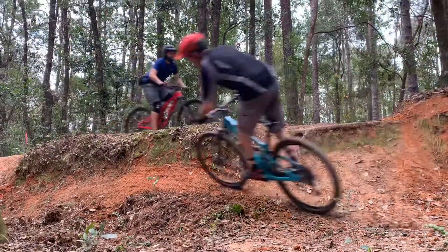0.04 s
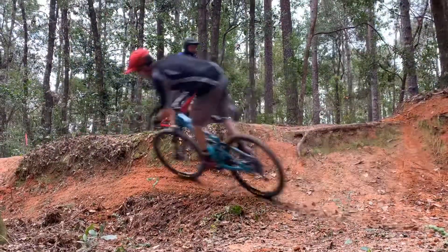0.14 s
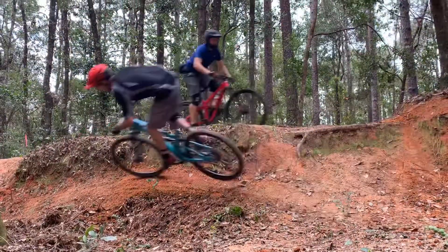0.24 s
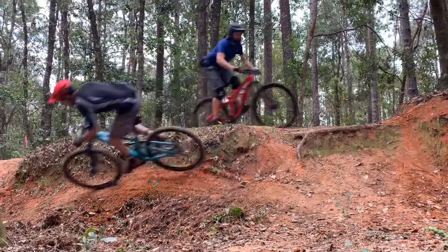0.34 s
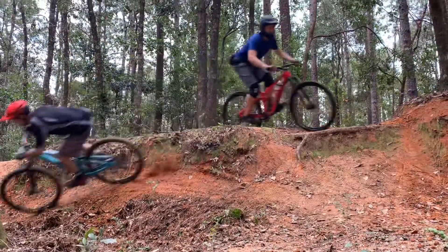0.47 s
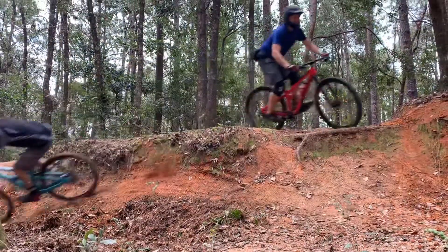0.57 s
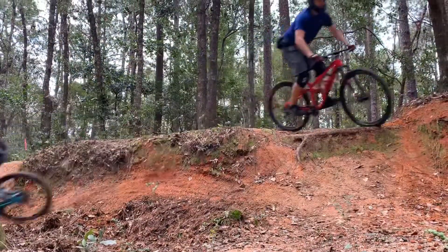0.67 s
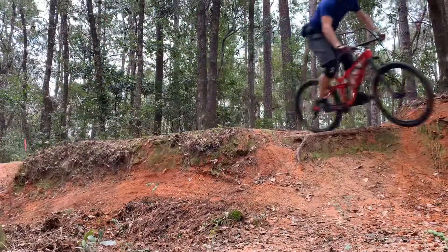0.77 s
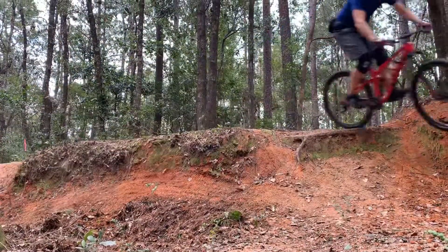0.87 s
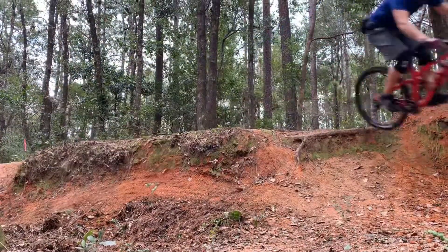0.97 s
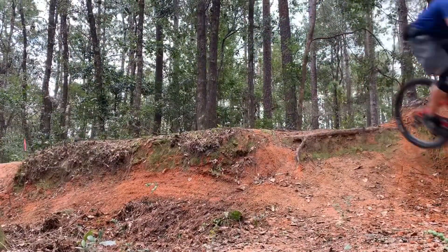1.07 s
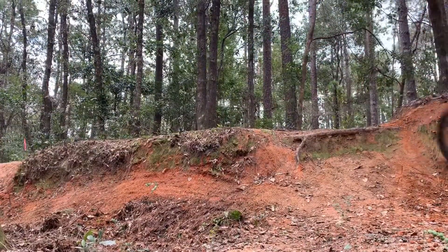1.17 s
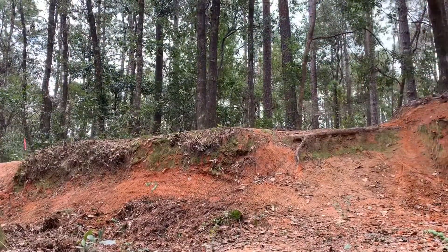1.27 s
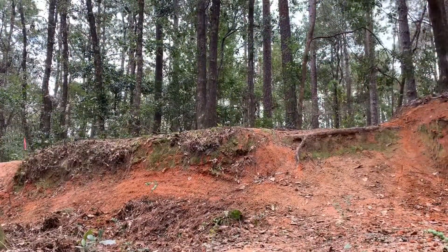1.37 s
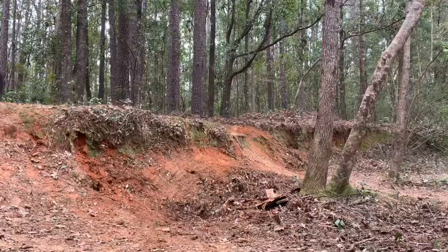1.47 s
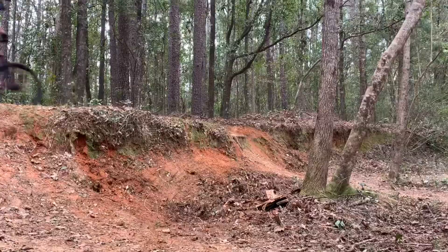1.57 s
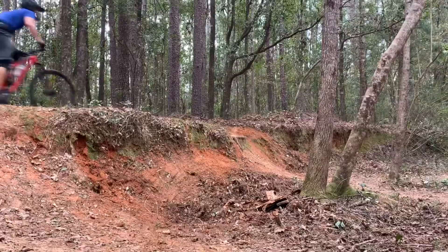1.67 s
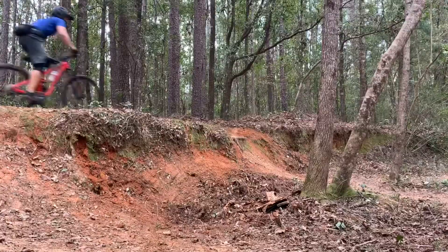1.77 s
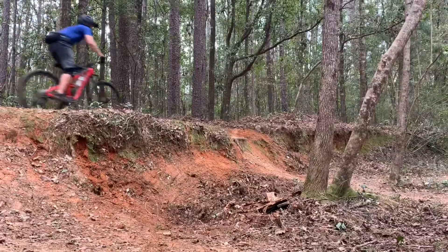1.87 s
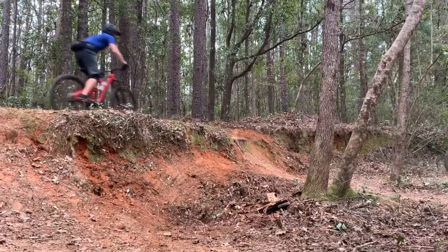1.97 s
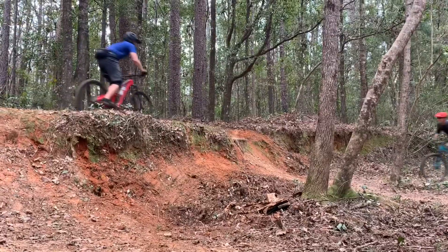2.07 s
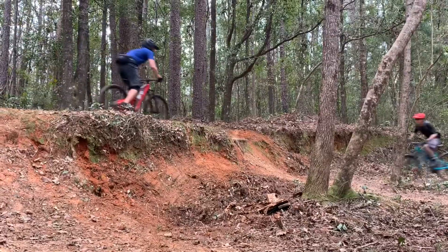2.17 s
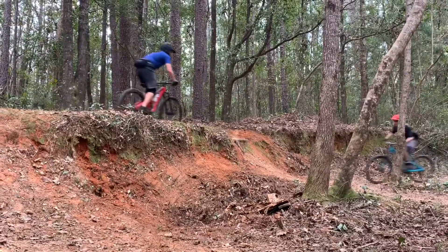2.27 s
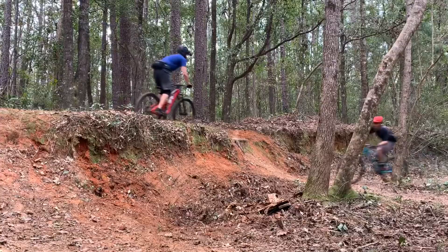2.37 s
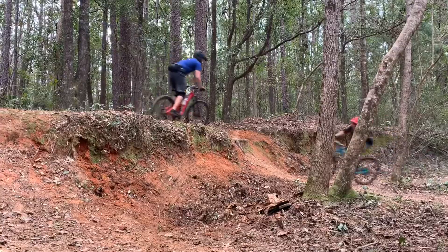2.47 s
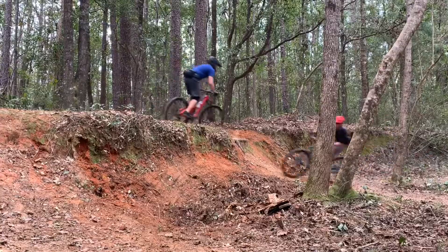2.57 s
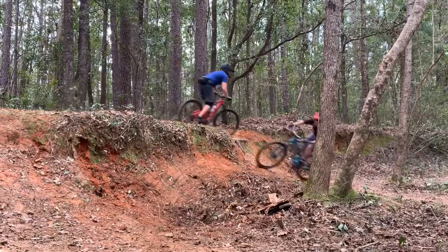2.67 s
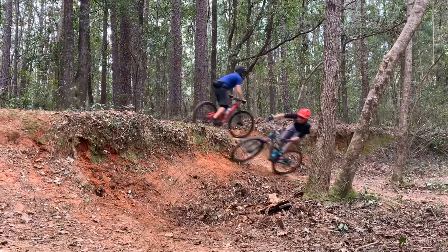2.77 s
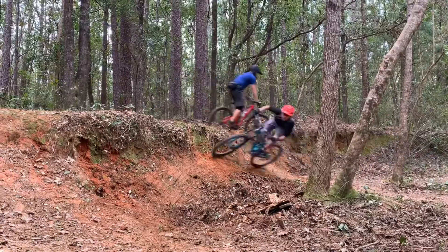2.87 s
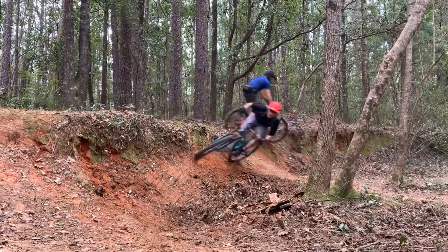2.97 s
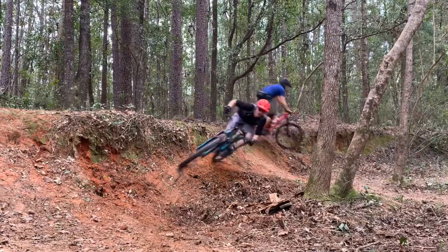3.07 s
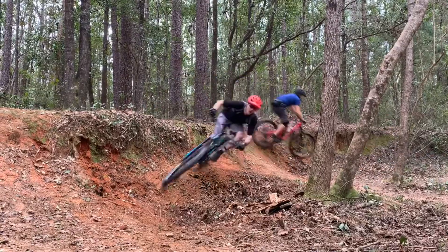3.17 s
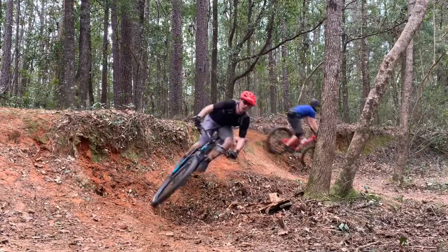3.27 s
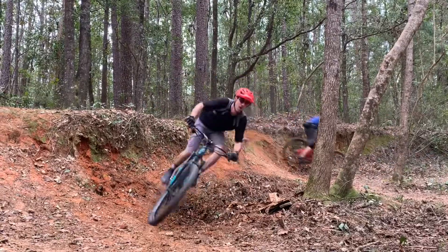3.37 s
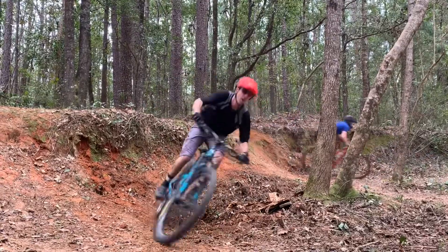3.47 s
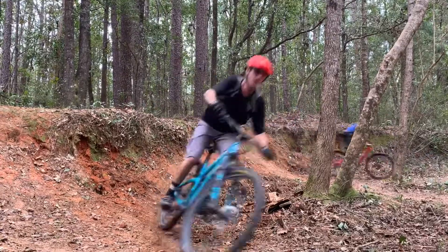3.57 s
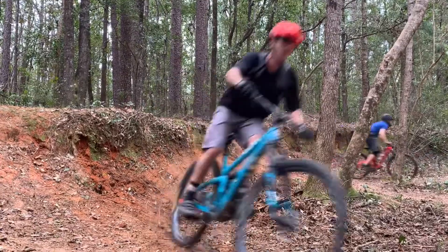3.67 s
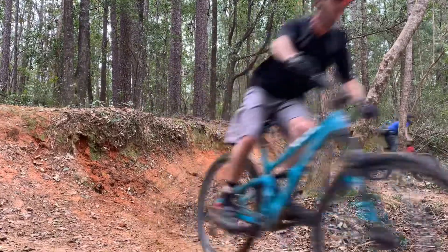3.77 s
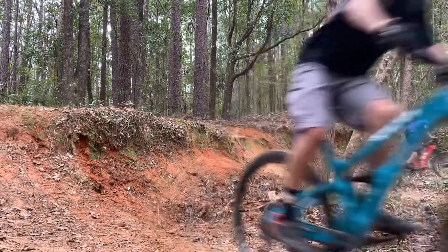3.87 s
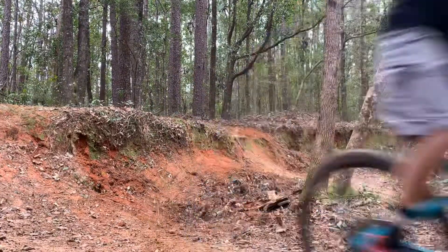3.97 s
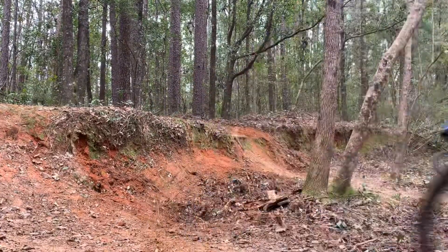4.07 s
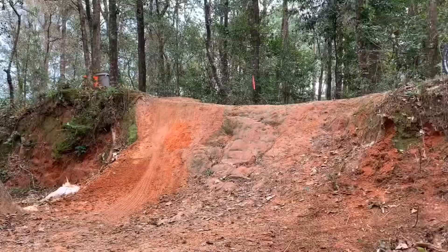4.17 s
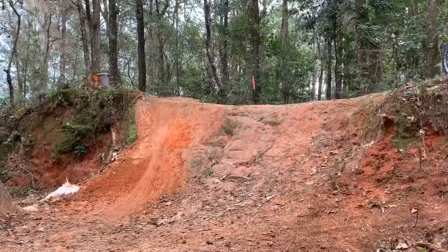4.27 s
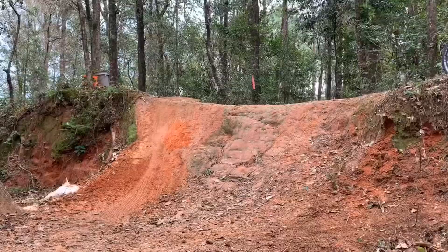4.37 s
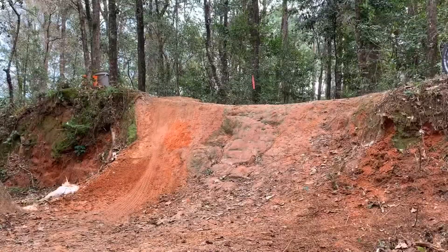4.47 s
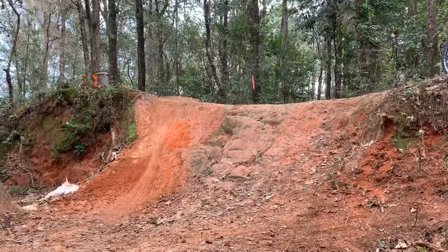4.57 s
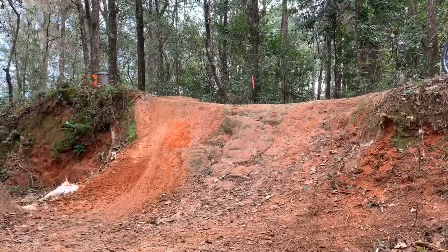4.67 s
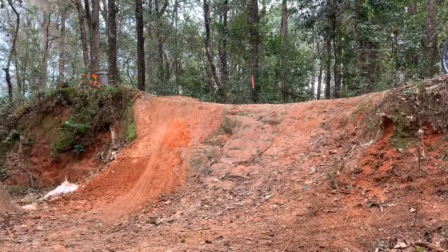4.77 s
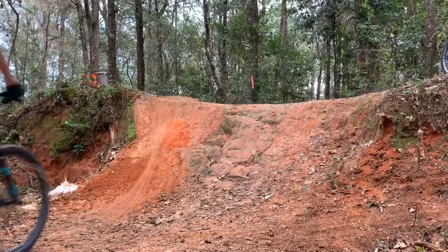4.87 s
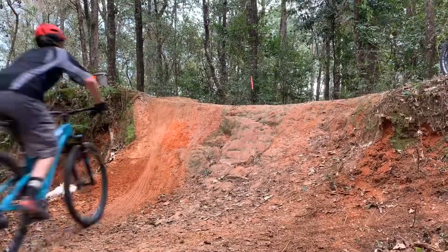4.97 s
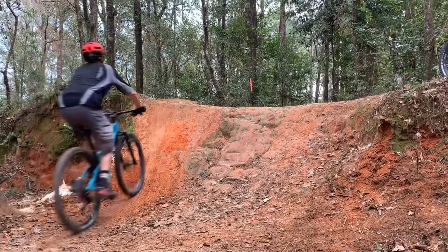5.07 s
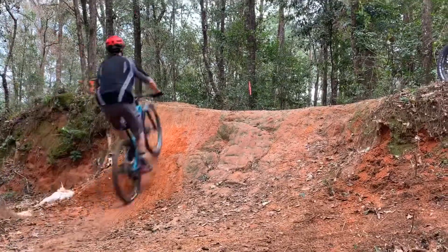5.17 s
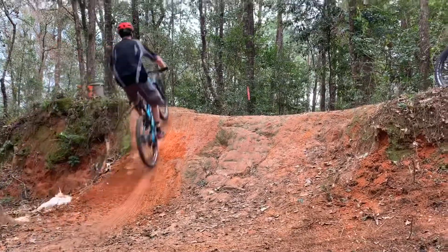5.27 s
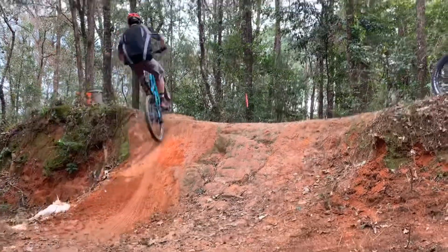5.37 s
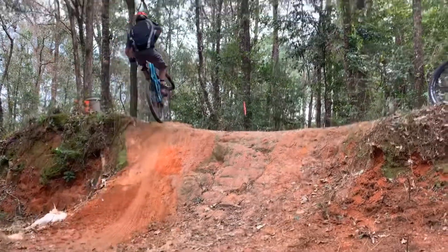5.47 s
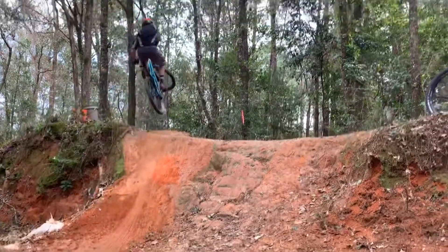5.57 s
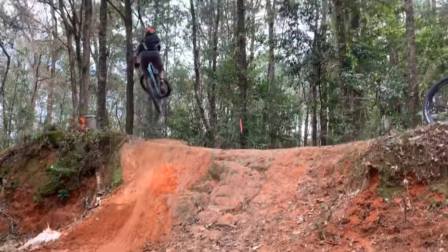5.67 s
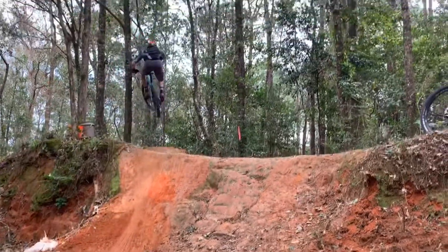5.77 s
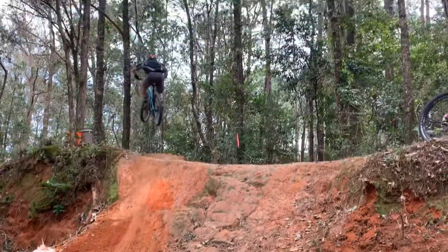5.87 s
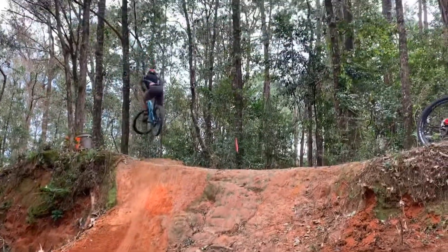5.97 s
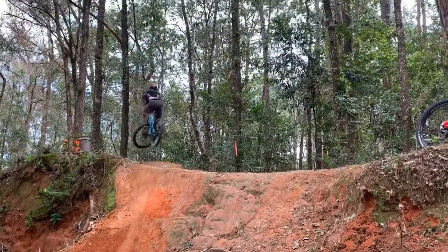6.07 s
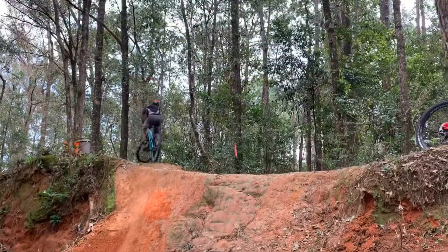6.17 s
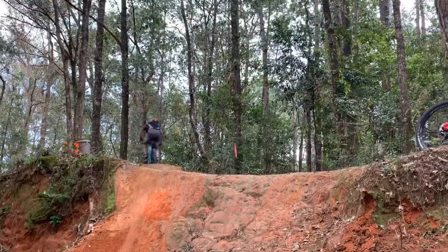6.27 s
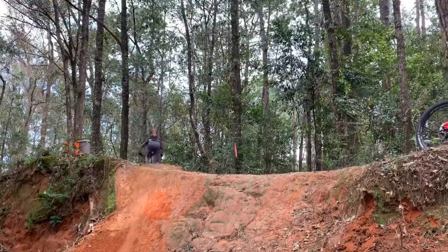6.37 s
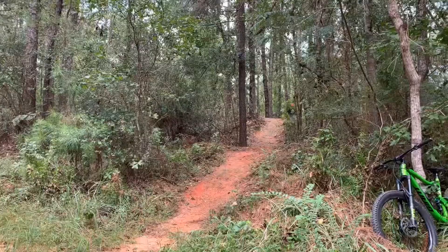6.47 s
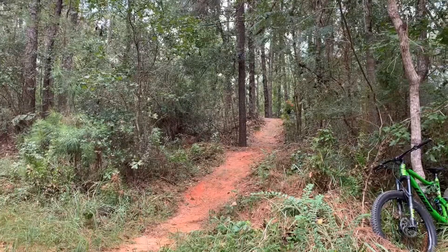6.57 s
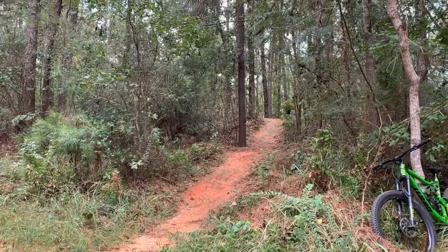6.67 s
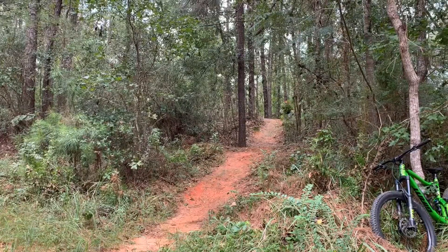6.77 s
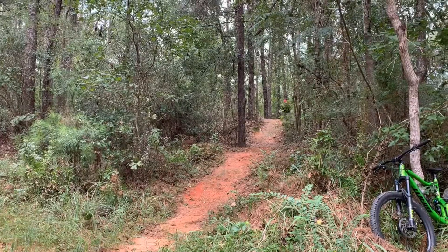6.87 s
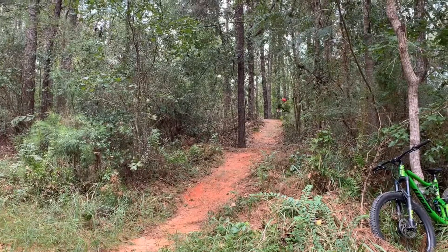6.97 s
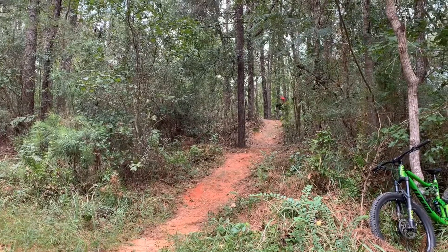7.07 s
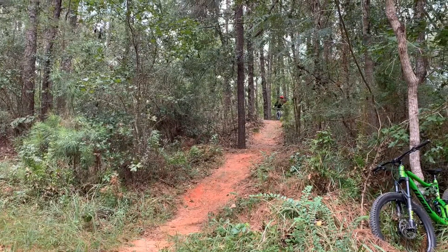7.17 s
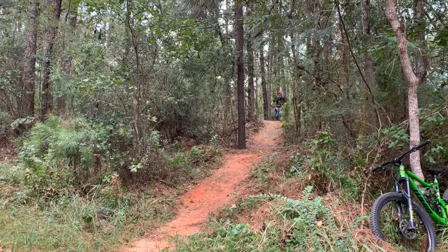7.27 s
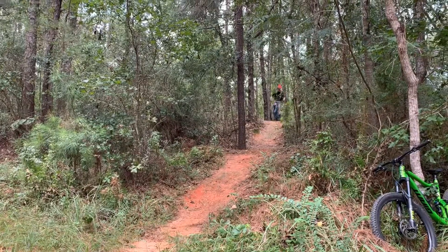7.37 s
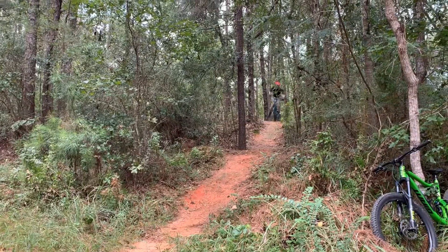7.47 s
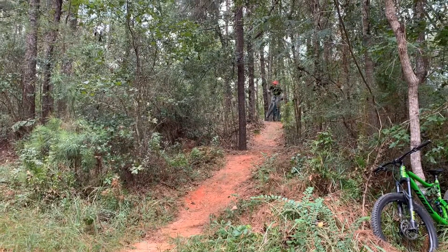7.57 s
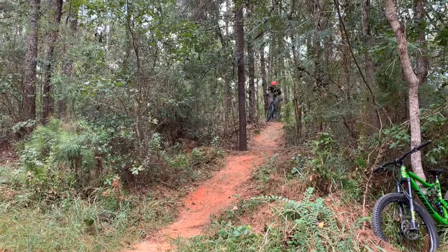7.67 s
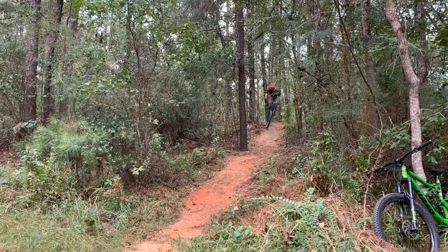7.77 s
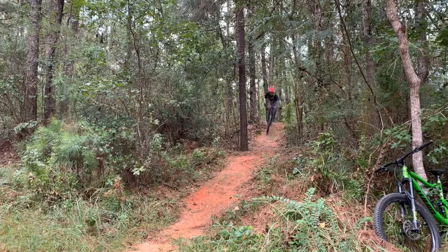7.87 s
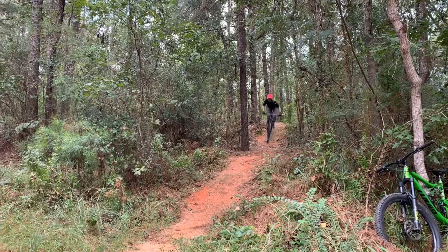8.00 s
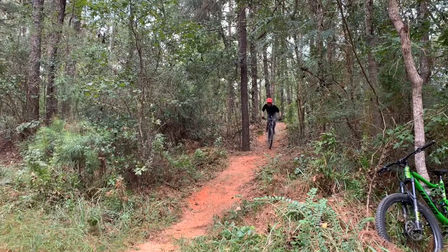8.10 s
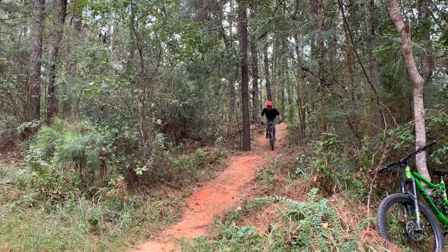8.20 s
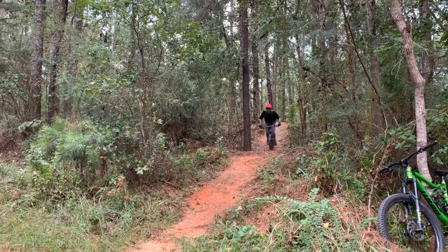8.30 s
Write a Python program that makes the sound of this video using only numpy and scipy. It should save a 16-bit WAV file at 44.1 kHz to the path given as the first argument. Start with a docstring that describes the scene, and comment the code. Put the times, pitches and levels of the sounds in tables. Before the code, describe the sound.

Four outdoor scenes joined by hard cuts, heard from beside a dirt trail. Freehubs tick rapidly over gritty tyre rumble; a heavy slam and metallic clatter end the first pass. A softer approach grows into a close crunching pass-by. Next, tyres hum and buzz quickly up hard clay, then quieten with deep rumbling thuds. Finally still forest air, two short echoing bird calls, and a far bike returning faintly.

```python
"""A pine wood with dirt jumps, where mountain bikes ride past in four short scenes joined by cuts.
Freehubs tick as noise bursts that ring the hub; tyres rumble, crunch and roar as grainy filtered noise.
One bike lands hard close by and its chain slaps the frame: low sine thuds and short ringing bursts.
In the last scene a far bird, made of gliding sines with an echo, calls twice over the quiet air."""
import sys
import numpy as np
from scipy import signal
from scipy.fft import rfft, irfft, next_fast_len
from scipy.io import wavfile
from scipy.ndimage import uniform_filter1d

SR = 44100
rng = np.random.default_rng(int(sys.argv[2]) if len(sys.argv) > 2 else 0)


def dump_mix(stems):
    """Bounce the given channels to the path in sys.argv[1] as a 16-bit WAV at rate SR."""
    frames = np.atleast_2d(stems).T  # one column per channel
    limited = np.clip(frames, -1, 1)  # hard clip at full scale
    pcm = np.round(limited * 32767).astype(np.int16)
    wavfile.write(sys.argv[1], SR, pcm)


N = 367675
TIME = np.arange(N) / SR


def undb(db):
    """Turn decibels into gain."""
    return 10 ** (np.asarray(db) / 20)


def unit(x):
    """Scale to an rms (average strength) of 1."""
    return x / np.sqrt(np.mean(x ** 2))


def curves(rows):
    """Draw each column of a table as a line through time."""
    s, *columns = np.transpose(rows)
    return [np.interp(TIME, s, column) for column in columns]


def colour(x, points, size=2048):
    """Filter with the given (f/Hz, level/dB) outline, never sounding ahead of its input."""
    hz, db = np.transpose(points)
    grid = np.maximum(np.arange(size // 2 + 1) * SR / size, 1)
    outline_db = np.interp(np.log(grid), np.log(hz), db)
    # folding the cepstrum forward gives the filter with the least delay
    cepstrum = irfft(np.log(undb(outline_db)))
    cepstrum[1:size // 2] *= 2
    cepstrum[size // 2 + 1:] = 0
    response = irfft(np.exp(rfft(cepstrum)))
    return signal.oaconvolve(np.atleast_2d(x), response[None], axes=1)[:, :x.shape[-1]]


def ring(x, hz, width_hz):
    """One resonance, with gain 1 at its centre."""
    hz = min(hz, .45 * SR)
    return signal.lfilter(*signal.iirpeak(hz, hz / min(width_hz, SR / 4), fs=SR), x)


def rings(x, rows):
    """Several (f/Hz, width/Hz, level/dB) resonances sounding together."""
    return sum(undb(db) * ring(x, hz, width) for hz, width, db in rows)


def fade(x, decay_s):
    """Give every impulse an exponential tail."""
    return signal.lfilter([1], [1, -np.exp(-1 / (decay_s * SR))], x)


def walk(rate):
    """A random wander in straight lines, with `rate` new targets per second."""
    knots = rng.standard_normal(4096)
    return np.interp(TIME * rate, np.arange(len(knots)), knots)


def noise():
    """Two unrelated white noises."""
    return rng.standard_normal((2, N))


# how spread out the sound is between the trees: f/Hz, level/dB (side against middle)
STEREO_SPREAD = [(50, -16), (130, -15), (280, -15.5), (550, -7), (1100, -4), (2200, 0), (5500, 0.5),
                 (7500, -30.5), (15000, -26)]


def ears(x):
    """Two unrelated signals become left and right: bass and top nearly alike, the middle diffuse."""
    side = colour(x[1], STEREO_SPREAD)[0]
    return np.array([x[0] + side, x[0] - side])


# the scene jumps to another spot on the trail: t/s
CUTS = [1.398, 4.108, 6.358]


def swell(s, rise_db_per_s, fade_db_per_s):
    """Gain that climbs to 1 at its peak and fades again; cuts bound it, and rate signs do not matter."""
    start, end = np.array([0, *CUTS, N / SR])[np.searchsorted(CUTS, s) + np.arange(2)]
    heard = slice(int(start * SR), int(end * SR))
    age, gain = TIME[heard] - s, np.zeros(N)
    gain[heard] = undb(-np.maximum(-age * abs(rise_db_per_s), age * abs(fade_db_per_s)))
    return gain


def sing(x, rows):
    """Steep resonances, each swelling and fading as a bike goes by."""
    out = 0
    for s, rise, fall, db, hz, width in rows:
        # ringing twice makes the sides of the band steeper
        band = ring(ring(x, hz, abs(width)), hz, abs(width))
        out = out + unit(band) * swell(s, rise, fall) * undb(db)
    return ears(out)


def tone(hz, gain, waver, rough_db, rate):
    """A sine that wavers in pitch and level."""
    on, out = gain > 1e-3, np.zeros(N)
    steps = np.arange(on.sum()) * rate / SR
    bend, flutter = (np.interp(steps, np.arange(1024), knots) for knots in rng.standard_normal((2, 1024)))
    phase = 2 * np.pi * np.cumsum(hz[on] * (1 + waver * bend)) / SR
    out[on] = np.sqrt(2) * np.sin(phase) * gain[on] * undb(rough_db * flutter)
    return out


def grit(rate, spread_db, decay_s, bed):
    """Many small fractures of uneven size, `rate` per second, over a smooth bed of rubbing."""
    sizes = undb(spread_db * np.minimum(rng.exponential(size=N), 4))
    strikes = (rng.random(N) < rate / SR) * sizes ** 2
    power = fade(strikes, decay_s / 2)  # power dies twice as fast as level
    return noise() * np.sqrt(power / power.mean() + bed)


def pebbles(rate, low_hz, high_hz, cycles, spread_db):
    """Clods, stones and twigs snap one by one, each a dying sine at a pitch of its own."""
    out, t = np.zeros((2, N + 1024)), TIME[:1024]
    for when, pitch, size, turn in rng.random((int(rate * N / SR), 4)):
        hz = low_hz * (high_hz / low_hz) ** pitch
        ping = np.sin(2 * np.pi * hz * t) * np.exp(-t * hz / cycles)
        ping *= undb(-spread_db * np.log(max(size, .04)))
        start = int(when * N)
        out[:, start:start + len(t)] += np.outer([1, 0.66 * np.cos(2 * np.pi * turn)], ping)
    no_bass = signal.butter(2, low_hz / 2, "high", fs=SR, output="sos")
    return unit(ears(signal.sosfilt(no_bass, out[:, :N])))


def nearness(gain):
    """How clearly single grains stand out: 1 from -33 dB tyre level up, less as the tyres recede."""
    return np.minimum(gain / undb(-33), 1) ** .35


def via_ground(x, share):
    """A bounce off the dirt, about a millisecond late, shifts the colour as the bike rises and falls."""
    late = TIME - 0.001112 * np.exp(0.237 * walk(2.5))
    return x + share * np.array([np.interp(late, TIME, channel) for channel in x])


def trees(x, t60_s, build_s):
    """Trunks scatter the sound into a thin, even tail that builds up and dies away."""
    t = TIME[:SR]
    tail = rng.standard_normal((2, SR)) * undb(-60 * t / t60_s) * (1 - np.exp(-t / build_s))
    return signal.oaconvolve(np.atleast_2d(x), tail / np.sqrt(np.sum(tail[0] ** 2)), axes=1)[:, :N]


# colour of the still air: f/Hz, level/dB (relative)
AIR_COLOUR = [(60, -7), (130, -9.5), (205, 4), (300, -23), (420, -15.5), (560, -22.5), (900, -20),
              (1400, -33.5), (2000, -57), (3000, -78), (5000, -35), (9000, -38), (15000, -53)]


def air():
    """Still air among the trees: soft noise whose level wanders slowly."""
    return unit(ears(colour(noise(), AIR_COLOUR))) * undb(-49.5 + 2.0 * walk(2.45))


# stretches of tyre noise, and a deep wind-like rumble near 6.2 s, each swelling to a peak and fading:
# peak t/s, swell rate/(dB/s), fade rate/(dB/s),
# then level/dB of deep rumble, casing, soil and leaves, before each layer's trim
ROLLS = [(.04, 3, 98, -31, -30.5, -30, -34), (.2, 5, 27, -35.5, -40.5, -69, -39),
         (0.399, 193, 20, -29, -29.5, -39, -39), (1.137, 893, 35.5, -23, -19.5, -35, -36),
         (1.42, 200, 84.5, -49, -56, -41.5, -38), (1.66, 34, 11, -40, -45.5, -45, -43),
         (2.1, 9, 15, -45, -41, -45.5, -63), (2.8, 46, 50, -34.5, -45, -55, -38.5),
         (2.974, 597, 68, -28, -38, -39.5, -35.5), (3.54, 35.5, 28, -31, -28.5, -29.5, -35),
         (3.92, 79, 86, -33, -28.5, -27, -28.5), (4.1, 105.5, 25, -31.5, -26, -25.5, -26.5),
         (4.38, 71, 26, -58, -52, -44, -42), (4.58, 35, 38, -55, -42, -36, -38),
         (4.73, 116, 46, -52, -33.5, -52, -28.5), (4.98, 33, 63, -35.5, -25.5, -39, -55),
         (5.18, 23, 73, -44, -28.5, -29, -40), (5.28, 200, 122, -41, -28, -33, -43),
         (5.6, 12, 7, -62, -67, -55, -49), (6.2, 51, 111.5, -32, -55.5, -68, -70),
         (6.26, 495, 58, -39.5, -54, -46.5, -45), (6.4, 92.5, 73, -62, -46.5, -48, -58.5),
         (7.22, 16, 34, -44, -46.5, -51, -51.5), (7.925, 700, -1, -44, -46, -47.5, -52.5),
         (8.3, 19, 3, -37.5, -46, -46, -47)]


def rolling():
    """Gains of deep rumble, casing, soil and leaves: overlapping rows add in power."""
    rows = np.array(ROLLS)
    swells = np.array([swell(*row) for row in rows[:, :3]])
    return np.sqrt(undb(rows[:, 3:].T) ** 2 @ swells ** 2)


# colour of the deep rumble: f/Hz, level/dB (relative)
RUMBLE_COLOUR = [(20, -58), (33, -38), (48, -4), (70, 0), (110, -3), (150, -10), (250, -29.5), (600, -57)]


def deep_rumble(gain):
    """Low noise that never quite stops and grows with the given gain."""
    rumble = unit(ears(colour(noise(), RUMBLE_COLOUR, size=8192)))
    return rumble * np.hypot(gain * undb(0.5), undb(-44.0))


# colour of the tyre casing: f/Hz, level/dB (relative)
CASING_COLOUR = [(30, -43), (90, -16.5), (145, -8), (180, -2.5), (225, -2), (272, 1.5), (330, -6),
                 (390, -6), (500, -10), (800, -23), (1600, -50.5)]


def casing(gain):
    """Bumps drum the air-filled casings: coarse grains with a low colour."""
    drumming = grit(rate=220, spread_db=2.5, decay_s=0.0065, bed=0.81)
    return unit(ears(colour(drumming, CASING_COLOUR))) * gain * undb(-1.28)


# colour of crunching soil: f/Hz, level/dB (relative)
SOIL_COLOUR = [(40, -46), (250, -22.5), (450, 3.5), (620, 6.5), (800, -4), (1050, -3), (1250, -8.5),
               (1550, 0), (2100, -10.5), (3500, -19), (8000, -80)]
# hollow notes of tyre and rim under the crunch: f/Hz, width/Hz, level/dB (relative)
WHEEL_RINGS = [(403, 22, -10), (480, 40, 2), (580, 33, -2), (693, 71, -2), (882, 21, -6.5), (1049, 29, 1),
               (1610, 17, -21)]


def soil(gain):
    """Knobs grind the soil, which rings tyre and rim; single clods snap when the tyres are close."""
    grind = grit(rate=400, spread_db=3.6, decay_s=0.008, bed=0.35)
    grind = colour(grind, SOIL_COLOUR) + rings(grind, WHEEL_RINGS)
    clods = pebbles(rate=270, low_hz=450, high_hz=1700, cycles=4.9, spread_db=4.5)
    crunch = unit(ears(via_ground(grind, share=0.63))) + undb(-2.5) * nearness(gain) * clods
    return crunch * gain * undb(-2.5)


# colour of dry leaves: f/Hz, level/dB (relative)
LEAF_COLOUR = [(1000, -32.5), (1900, 0), (2700, 5.5), (3300, 2.5), (3900, 4), (4500, 0.5), (5300, -5),
               (6500, 0), (9000, -22), (15500, -11)]


def leaves(gain):
    """Dry leaves crack in a dense bright rush; single twigs snap when the tyres are close."""
    rush = grit(rate=1000, spread_db=5.3, decay_s=0.007, bed=0.5)
    twigs = pebbles(rate=160, low_hz=1800, high_hz=5000, cycles=8, spread_db=4.5)
    crackle = unit(ears(colour(rush, LEAF_COLOUR))) + undb(-5.5) * nearness(gain) * twigs
    return crackle * gain * undb(-3.3)


# hollow bands of tyre roar, from the boom of the casing upwards, different on each stretch of ground:
# peak t/s, swell rate/(dB/s), fade rate/(dB/s), level/dB before trim, f/Hz, width/Hz of each of two filters
ROARS = [(.04, 10, 38, -36, 171, 40), (.06, 40, 71, -40.5, 996, 400), (.45, 120, 31, -32, 230.5, 150),
         (1.16, 405, 43, -46, 523, 200), (1.16, 400, 26.5, -36, 1060, 400),
         (1.15, 404, 24.5, -41, 2280, 400), (1.2, 58, 16, -45, 3050, 350), (2.05, 31, 37, -46.5, 860, 400),
         (2.3, 11, 9.5, -46.5, 497, 150), (2.7, 6.5, 38, -36, 166, 44.5), (2.85, 28, 42, -48, 1160, 560),
         (3.54, 45, 16, -34.5, 1030, 300), (3.48, 45, 18, -37.5, 660, 340),
         (3.66, 39.5, 13, -38.5, 1440, 260), (3.65, 17, 27, -36.5, 207, 70),
         (3.925, 92, 124, -39, 1870, 300), (4.39, 55, 31, -40, 1600, 800), (4.4, 48, 29, -48, 3350, 595),
         (4.68, 26, 25, -37.5, 447, 258), (5.0, 18, 30, -34, 215.3, 33.7), (5.18, 26, 44, -39, 1070, 300),
         (5.1, 23, 47, -36, 795, 250), (5.2, 50, 32, -41.5, 2270, 200), (6.05, 15, 30, -57, 980, 399),
         (7.1, 32.5, 22, -59.5, 1320, 396), (7.93, 900, 0, -49, 1380, 300), (8.1, 70, 3, -51, 2170, 400),
         (8.25, 37, 0, -47, 870, 300)]


def roar():
    """Grainy noise excites hollow bands that swell and fade."""
    return undb(-1.5) * sing(grit(rate=260, spread_db=4.0, decay_s=0.006, bed=0.25), ROARS)


# where the tyres are: t/s, bearing (0 ahead to 1 far left)
BEARING = [(0, 0.15), (4.1, 0.055), (4.12, 0.58), (4.7, 0.69), (5.1, 0.026), (6.35, 0.2), (6.38, 0.09)]


def tyres(casing_gain, soil_gain, leaf_gain):
    """All tyre layers together, following the bike's bearing."""
    left, right = casing(casing_gain) + soil(soil_gain) + leaves(leaf_gain) + roar() + tread()
    bearing, = curves(BEARING)
    # the far side hears the bike later and softer
    right = np.interp(TIME - 0.00045 * bearing, TIME, right)
    return np.array([left * undb(5.3 * bearing), right * undb(-2.5 * bearing)])


# bikes coast past with the freehub ticking: peak t/s, swell rate/(dB/s), fade rate/(dB/s),
# level/dB before trim, hub (0 hidden to 1 in plain sight)
COASTS = [(0.07, 6, 46, -29.5, 0.53), (.25, 23, 25, -34, 0.64), (.45, 53, 13, -34, 0.25),
          (0.779, 12, 8, -38.5, 0), (1.238, 45, 42, -30, 0.088), (1.76, 102, 1.5, -48.5, 0),
          (2.211, 250, 50, -39.5, 0.054), (2.44, 22, 37, -40, 0.015), (2.82, 57, 24, -35, 0.013),
          (3.724, 27, 3, -33, 0.17), (4.056, 27, -8, -26, 0.76), (4.7, 173, 16, -34.5, 0.44),
          (4.86, 104, 18, -27.5, 0.0078), (5.42, 26, 10.5, -38, 0.14), (6.26, 96, 82, -39.5, 0),
          (7.1, 19.5, -2, -65, 0), (7.53, 107, 6.5, -57.5, 0.3), (7.96, 87, 9, -47.5, 0.13)]


def coasting():
    """Gain and openness of the freehubs; the loudest hub sets the sharpness of the ticks."""
    rows = np.array(COASTS)
    gains = np.array([swell(*row) for row in rows[:, :3]]) * undb(rows[:, 3:4])
    return np.linalg.norm(gains, axis=0), np.clip(rows[np.argmax(gains, axis=0), 4], 0, 1)


# speed of the ratchet, which follows wheel speed and back-pedalling: t/s, rate/(pawl clicks per s)
RATCHET = [(0.0, 42.8), (0.04, 60.4), (0.13, 70.3), (0.17, 51.3), (0.33, 53.9), (0.38, 76.7), (0.45, 75.9),
           (0.49, 53.4), (0.55, 80.9), (0.72, 83.1), (0.78, 74.0), (0.92, 74.1), (1.0, 57.2), (1.55, 33.3),
           (2.15, 50.2), (2.3, 94.1), (2.55, 80.1), (2.76, 97.1), (3.0, 74.1), (3.1, 88.1), (3.3, 65.1),
           (3.42, 76.1), (3.7, 74.6), (3.8, 62.0), (3.865, 55.1), (3.91, 30.4), (3.955, 56.1), (4.1, 56.3),
           (4.3, 39.1), (4.65, 49.6), (4.7, 75.7), (4.82, 99.2), (5.0, 112.0), (5.21, 115.0), (5.27, 92.0),
           (5.7, 70.9), (6.02, 56.0), (6.12, 65.0), (6.25, 98.0), (6.4, 37.9), (7.45, 41.2), (7.7, 36.8),
           (7.9, 42.0), (8.0, 68.0), (8.3, 75.0)]


def ratchet(facing):
    """Pawls snap over the ratchet teeth, each with a short burst of noise, at an evened-out level."""
    attack_s = .0005
    rate, = curves(RATCHET)
    teeth = np.cumsum(rate) / SR
    tooth, age = teeth.astype(int), teeth % 1 / rate
    size = undb(1.5 * rng.standard_normal(2048))[tooth]
    # a hidden hub is heard by scattered paths, which lengthen each snap and fill the gaps
    snap = size * np.exp(-age / (.0068 - 0.00053 * facing)) * (1 - np.exp(-age / attack_s))
    power = snap ** 2 + undb(-5 - 17 * facing) ** 2
    # the same metal answers every tooth, so part of each snap repeats the same shape
    t = TIME[:SR // 40]
    answer = rng.standard_normal((2, len(t))) * np.exp(-t / 0.007) * (1 - np.exp(-t / attack_s))
    clicks = np.diff(tooth, prepend=0) * size
    repeats = signal.oaconvolve(clicks[None], answer, axes=1)[:, :N]
    return (noise() * np.sqrt(power) + .55 * repeats) / np.sqrt(uniform_filter1d(power, size=3000))


# colour of the ticking hub: f/Hz, level/dB (relative)
HUB_COLOUR = [(1200, -12.5), (2300, -24.5), (3800, 1), (4600, -1), (6000, 0.5), (7600, 4.5), (8700, -1),
              (9700, 7.5), (10800, 4), (12000, 9.5), (13800, 4), (14700, 5.5), (15700, -1)]
# rings of the hub shell and rim: f/Hz, width/Hz, level/dB (relative)
HUB_RINGS = [(2900, 410, -2), (4000, 256, -9.5), (5340, 230, -3), (7450, 40, -7)]
# notes of hub and spokes that stand out as a bike turns: peak t/s, swell rate/(dB/s), fade rate/(dB/s),
# level/dB before trim, f/Hz, width/Hz of each of two filters
HUB_NOTES = [(.1, 10, 6, -40.5, 3800, 900), (.24, 25, 25, -45, 2300, 700),
             (3.75, 130, 40, -37.5, 3960, 450), (3.78, 50, 30, -46, 5360, 350),
             (4.0, 60, 5, -39, 4500, 2500), (4.81, 90, 45, -37.5, 2680, 380),
             (4.9, 40, 50, -38.5, 3780, 500), (4.84, 90, 24, -41, 5160, 280), (7.7, 8, 0, -67.5, 5250, 400),
             (7.55, 25, 0, -66.5, 3950, 600)]


def freehub(gain, facing):
    """The snapping ratchet rings the metal hub, and a bounce off the ground joins in."""
    burst = ratchet(facing)
    shell = colour(burst, HUB_COLOUR) + rings(burst, HUB_RINGS)
    ticking = unit(ears(via_ground(shell, share=.3))) * gain * undb(4.5)
    return ticking + undb(-1.0) * sing(burst, HUB_NOTES)


# chain slaps, frame rattles, flicked stones and tyre scuffs:
# t/s, level/dB before trim, centre f/Hz, decay time/s
CLACKS = [(0.047, -23.5, 1150, 0.031), (.402, -29, 2280, 0.069), (.44, -28, 2270, 0.023),
          (.445, -23.5, 745, 0.025), (.663, -24, 3690, 0.0035), (.71, -27, 2500, 0.006),
          (.882, -23, 3820, 0.0036), (1.044, -25, 3830, 0.0033), (0.799, -28, 1260, 0.0034),
          (0.922, -28.5, 1290, 0.0085), (1.129, -16.5, 775, 0.0078), (1.139, -19.5, 2270, 0.0084),
          (1.143, -16, 6340, 0.0096), (1.171, -22, 1090, 0.0031), (1.2212, -12, 6450, 0.0053),
          (1.252, -19, 995, 0.0026), (1.274, -4.5, 6750, 0.0017), (1.2747, -18, 3000, 0.0027),
          (1.275, -21, 756, .005), (1.307, -24, 1200, 0.0035), (1.309, -20.5, 3000, .004),
          (1.276, -13, 12100, 0.0018), (1.307, -2.5, 10800, 0.0041), (1.367, -10, 7100, 0.0015),
          (1.371, -20, 6900, 0.0023), (1.41, -20.5, 2740, 0.0063), (1.411, -21.5, 6730, 0.018),
          (1.44, -11, 9400, 0.003), (1.596, -28, 3050, 0.012), (1.597, -19, 9300, 0.0022),
          (1.685, -28, 4720, 0.0049), (2.85, -22, 2800, 0.0057), (3.173, -23, 3400, 0.0024),
          (3.223, -25, 784, 0.011), (3.255, -26, 2960, 0.0054), (3.315, -23.5, 4300, 0.0055),
          (3.406, -19.5, 2900, 0.0047), (3.413, -20, 1040, 0.0052), (3.447, -17, 580, 0.0094),
          (3.453, -20, 10500, .002), (3.578, -14.5, 910, 0.012), (3.723, -17, 1050, 0.0038),
          (3.877, -19, 595, .006), (3.919, -15, 704, 0.0081), (3.921, -14, 1830, 0.0046),
          (3.947, -14, 10500, 0.0023), (4.082, -13.5, 1500, 0.0094), (4.115, -26, 10200, .006),
          (4.298, -29, 1630, .003), (4.481, -13, 1280, 0.0021), (4.494, -25, 4100, 0.0015),
          (4.618, -23.5, 2440, 0.0047), (4.71, -18, 3160, 0.0035), (4.895, -20.5, 780, .004),
          (4.941, -15.5, 3430, 0.0061), (4.943, -21, 740, 0.0045), (5.019, -21, 3800, .003),
          (5.163, -24, 2320, 0.0033), (5.347, -27, 750, 0.0034), (7.215, -33, 1600, 0.005),
          (7.523, -37, 11000, 0.0024), (7.831, -44.5, 1540, 0.011), (7.847, -40, 6630, 0.012),
          (7.916, -34, 970, 0.0065), (7.921, -41, 2200, 0.0098), (7.941, -25, 10500, .003)]


def clacks():
    """Short bursts from chain, frame, stones and tyres, each with a faint after-rattle."""
    out, t = np.zeros((2, N)), TIME[:SR // 8]
    for s, db, hz, decay_s in CLACKS:
        contact = rng.standard_normal((2, len(t)))
        envelope = np.exp(-t / decay_s)
        ringing = unit(ring(contact, hz, 0.2 * hz))
        body = ringing * envelope
        # every burst gets the energy of its envelope, whatever the random draw
        body *= np.linalg.norm(envelope) / np.linalg.norm(body, axis=1, keepdims=True)
        rattle = .07 * ringing * np.exp(-t / 0.053)
        # the first instant of contact is much broader than the ring that follows
        tick = unit(ring(contact, hz, 1.8 * hz)) * np.exp(-t / 0.00022)
        start = int(s * SR)
        out[:, start:start + len(t)] += undb(db - 7.5) * (body + rattle + 0.19 * tick)
    return ears(out)


# wheels striking the ground, and deep thuds:
# t/s, level/dB, f/Hz, swell time/s before stretching, left minus right level/dB
THUDS = [(.41, -26, 74.5, 0.0049, 2), (1.134, -21, 330, 0.0037, -0.5), (1.1436, 0.5, 274.5, 0.0036, 0.5),
         (1.147, -13, 161.5, 0.0084, -2), (1.1528, -15, 289, 0.0023, 0.5), (1.18, -18, 347, 0.018, 0),
         (1.214, -17.5, 286, 0.0083, 0), (1.226, -19.5, 404, 0.0072, -8), (2.975, -18.5, 101, 0.0075, -1),
         (3.331, -20, 61, 0.012, -2), (5.91, -28, 57.6, 0.037, 6), (6.121, -19, 57.5, 0.012, 12),
         (6.184, -19.5, 57, 0.0078, -9), (6.208, -17.5, 60.3, 0.015, 4), (6.214, -21, 125, 0.0087, 4)]


def thuds():
    """Each blow is a sine that swells to a peak, then dies away."""
    out, t = np.zeros((2, N)), TIME[:SR // 4]
    for s, db, hz, swell_s, pan_db in THUDS:
        age = t / (1.22 * swell_s)  # 1 at the peak
        blow = age ** 2 * np.exp(2 - 2 * age) * np.sin(2 * np.pi * hz * t)
        start = int(s * SR)
        out[:, start:start + len(t)] += np.outer(undb([db + pan_db / 2, db - pan_db / 2]), blow)
    return out


# tread knobs drumming under load: peak t/s, swell rate/(dB/s), fade rate/(dB/s), level/dB,
# f/Hz at the peak, glide/(Hz/s)
KNOBS = [(.453, 1505, 400, -22, 650, -500), (4.965, 250, 280, -27, 254, 100),
         (5.08, 501.5, 71, -25, 269, 1), (5.2, 200.5, 94, -27, 266.8, 2.5), (4.91, 250, 199, -36, 478, 2),
         (5.175, 90.5, 126, -29, 595, 600), (5.42, 23, 180, -36, 269.7, -0.5)]


def tread():
    """Knobs pressed into hard clay hum unevenly: gliding sines that waver."""
    out = 0
    for s, rise, fall, db, hz, glide in KNOBS:
        pitch = hz + glide * (TIME - s)
        out = out + undb(db) * tone(pitch, swell(s, rise, fall), waver=0.037, rough_db=4.5, rate=110)
    return out


# a brief level dip at the first cut; the 0 dB row at the second changes nothing:
# t/s, length/s, level/dB
DROPOUTS = [(1.397, 0.012, -16.5), (4.105, 0.006, 0)]


def dropouts():
    """Gain of 1 except for a brief, smooth dip at the first cut."""
    return undb(sum(db * np.exp(-(2 * (TIME - s) / length_s) ** 4) for s, length_s, db in DROPOUTS))


def chirp(s, length_s, hz, fall, db):
    """One bird note: it opens and closes smoothly; the pitch holds, then drops ever faster."""
    along = np.clip((TIME - s) / length_s, 0, 1)
    pitch = hz * (1 - fall * along ** 2.5)
    return undb(db) * tone(pitch, np.sin(np.pi * along), waver=.008, rough_db=3.5, rate=250)


# a far bird calls twice, a soft lead-in and two falling whistles; a thin high note follows:
# t/s, length/s, starting f/Hz, share by which the pitch drops, level/dB before trim
BIRD_NOTES = [(6.526, .046, 2860, .025, -58), (6.562, .036, 4420, .18, -48.5),
              (6.593, .042, 2660, .055, -43), (7.16, .044, 2900, .01, -58), (7.196, .026, 4500, .11, -48),
              (7.216, .042, 2870, .09, -44.5), (7.32, .05, 6800, .05, -56)]


def bird():
    """The calls come from deep among the trunks, each trailed by its echo."""
    calls = sum(chirp(*note) for note in BIRD_NOTES)
    return undb(-4) * calls + undb(-4) * trees(calls, t60_s=.62, build_s=.04)


def scene():
    """Bikes, blows with their echo off the trees, and the wood around them."""
    rumble_gain, *tyre_gains = rolling()
    blows = clacks() + thuds()
    echo = undb(-17) * trees(blows, t60_s=0.078, build_s=0.0055)
    bikes = tyres(*tyre_gains) + freehub(*coasting()) + blows + echo
    return (air() + deep_rumble(rumble_gain) + bikes + bird()) * dropouts()


def record(dry):
    """The treble reaches the left port a little later than the right; peaks clip and the top is cut."""
    late_from_hz, late_s, top_hz = 5850, 1 / 5050, 15850
    size = next_fast_len(N + 1024)
    hz = np.arange(size // 2 + 1) * SR / size
    lag = np.exp(-2j * np.pi * np.maximum(hz - late_from_hz, 0) * late_s)
    left = irfft(rfft(dry[0], size) * lag, size)[:N]
    top_cut = signal.ellip(10, .2, 70, top_hz, fs=SR, output="sos")
    return signal.sosfilt(top_cut, np.clip([left, dry[1]], -1, 1))


dry = scene()
out = record(dry)
dump_mix(out)
```